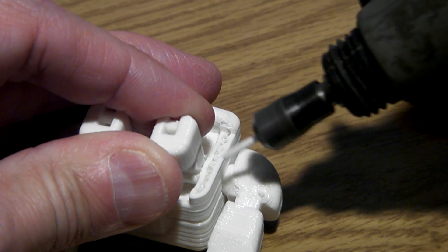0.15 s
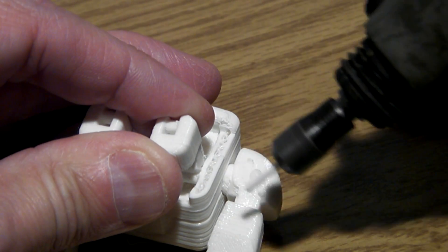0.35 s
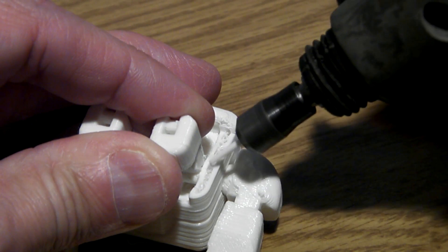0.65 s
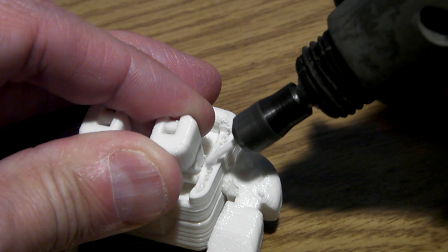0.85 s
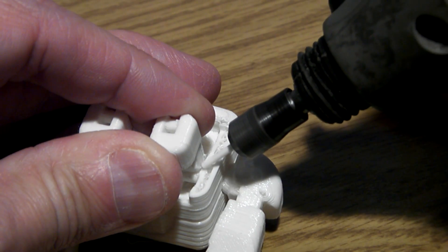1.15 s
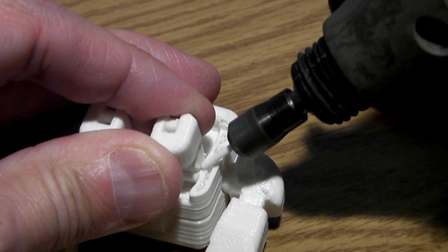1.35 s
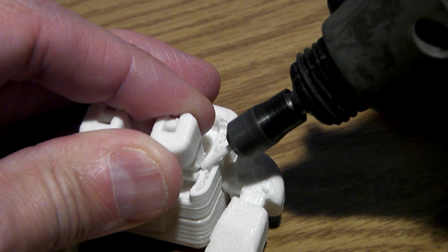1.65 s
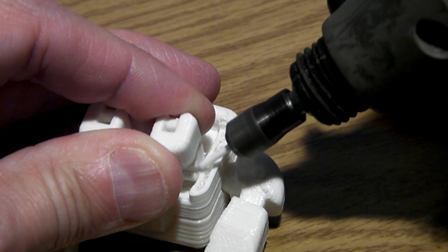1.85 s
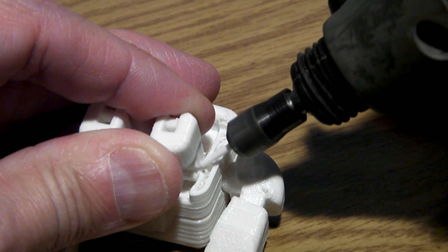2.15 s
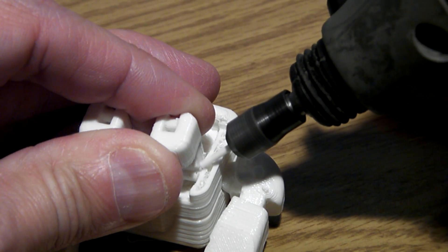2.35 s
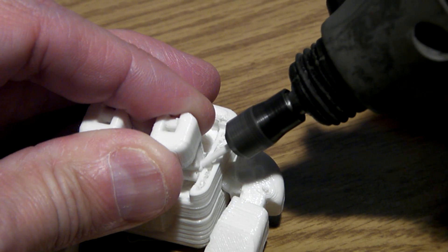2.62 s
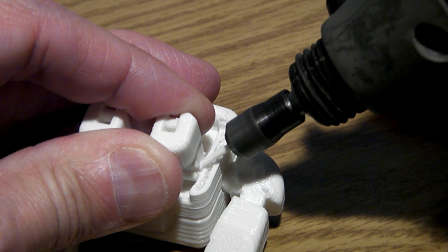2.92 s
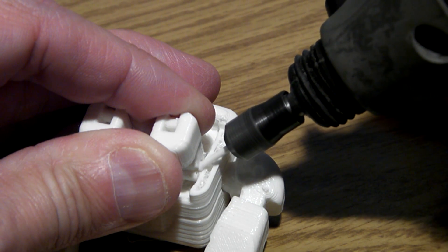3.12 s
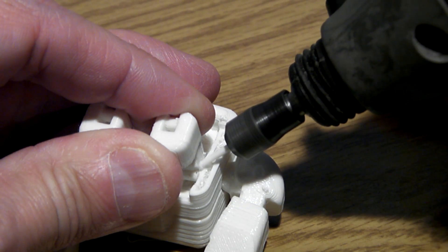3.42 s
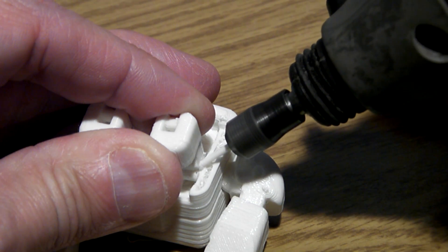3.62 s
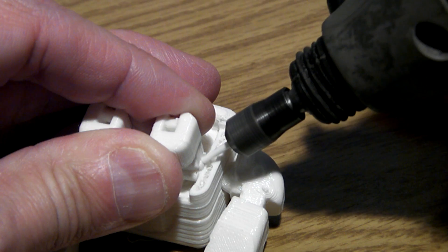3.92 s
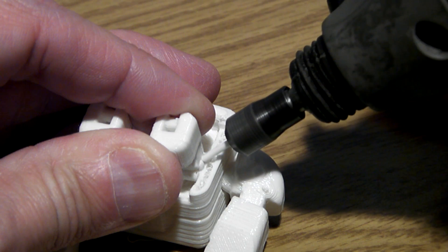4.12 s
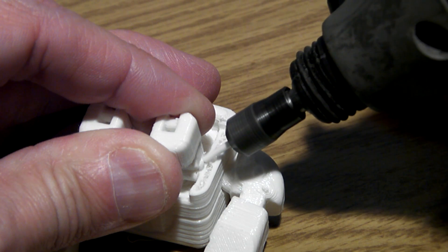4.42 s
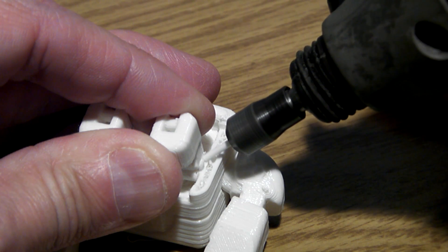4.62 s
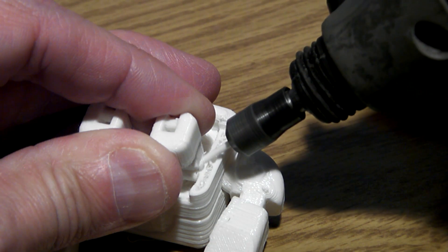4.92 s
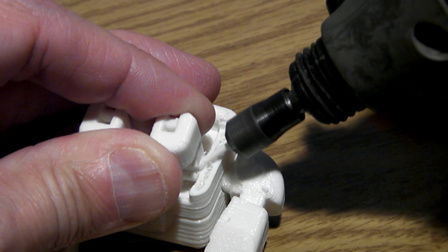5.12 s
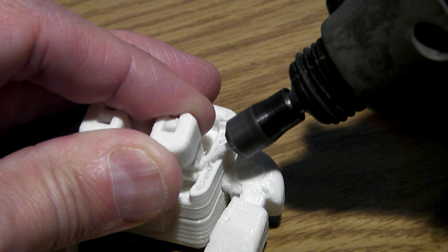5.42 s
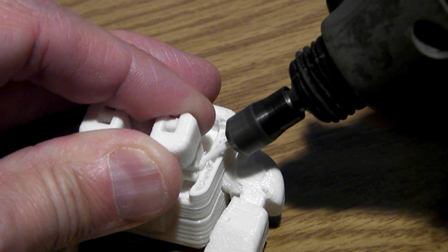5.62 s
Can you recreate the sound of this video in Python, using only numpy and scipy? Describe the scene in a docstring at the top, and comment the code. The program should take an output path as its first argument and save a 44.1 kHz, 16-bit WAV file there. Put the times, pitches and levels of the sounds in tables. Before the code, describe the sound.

Close, piercing electric motor whine with airy hiss and mains buzz; a few quick plastic rattles and scrapes after one second, then a continuous drone.

```python
"""A mains motor whines in a handheld rotary tool at about 18000 turns a minute, close to a mono microphone.
One shaft angle drives sines for the armature slots, fan blades, bearings and rotor harmonics.
The tool spins a plastic filament against a printed part: the touches ring as chatter and scrape, then the
filament melts into the seam and drags the speed down a little. Shaped noise makes the fan and brush hiss
and one hollow rush; a damped low sine makes a bump on the bench."""
import sys
import numpy as np
from scipy import signal
from scipy.fft import rfft, irfft
from scipy.io import wavfile

SR = 44100
rng = np.random.default_rng(int(sys.argv[2]) if len(sys.argv) > 2 else 0)


def unload_audio(sound):
    """Save the sound as a 16-bit wav file, at the path given as the first command line argument."""
    columns = np.transpose(np.atleast_2d(sound))
    # keep every value between -1 and 1, then stretch to whole-number steps
    steps = np.round(np.clip(columns, -1, 1) * 32767)
    wavfile.write(sys.argv[1], SR, steps.astype(np.int16))


N = 254456
T = np.arange(N) / SR
HZ = np.fft.rfftfreq(N, 1 / SR)

# shaft speed: t/s, rate/(turns/s)
SHAFT_SPEED = [(0, 308.0), (0.7, 307.8), (1.4, 307.0), (1.6, 306.1), (1.9, 304.1), (2.15, 303.5),
               (2.35, 301.7), (2.7, 299.3), (2.9, 298.3), (3.17, 298.3), (3.35, 297.5), (3.8, 296.8),
               (4.4, 295.9), (4.62, 296.8), (4.8, 296.0), (5.05, 296.0), (5.4, 295.3), (5.77, 295.0)]
# loud tones, before trim and flutter: free level/dB, loaded level/dB, change while drawn back/dB
SLOT_BUZZ = (-30, -29.5, -4)
BLADE_TONE = (-26.5, -23.5, -.5)
BLADE_OCTAVE = (-30, -31.5, -4)
LOW_WHISTLE = (-32, -33.5, 1)
HIGH_WHISTLE = (-31, -32.5, -2)
# hand draws the tool back: t of farthest point/s, half length/s
DRAW_BACK = (0.26, 0.2)
# further bearing tones, before trim: multiple of inner race rate, shaft sideband, free level/dB, loaded level/dB
BEARING_TONES = [(5, 1, -50, -56), (7, 1, -38, -43), (8, 1, -36, -34), (9, 1, -35.5, -31),
                 (12, -2, -33, -35)]
# rotor harmonics, before trim: multiple of shaft rate, free level/dB, loaded level/dB
SHAFT_HARMONICS = [(1, -46.5, -49), (2, -52.5, -57.5), (6, -41.5, -44.5), (7, -40, -44), (10, -43.5, -40.5),
                   (11, -40, -36), (12, -48.5, -38), (14, -36.5, -36), (15, -41, -41.5), (16, -41.5, -39.5),
                   (17, -41, -42), (19, -42, -61), (20, -49, -38), (21, -44, -49), (22, -37, -42.5),
                   (24, -32.5, -44), (31, -37, -40), (33, -32, -40), (34, -33.5, -34.5), (37, -52, -39),
                   (38, -45, -43), (41, -37, -39), (42, -42, -37), (43, -38, -42), (45, -43, -42),
                   (46, -36, -38), (47, -32, -37), (48, -38, -30), (49, -36, -30)]
# peaks and dead spots the tones slide through: f/Hz, width/Hz, lift/dB
TONE_SPOTS = [(2332, 16, -3), (2393, 20, 4), (2403, 8.4, -10), (2445, 23, 3), (2463, 11, -2.5),
              (4540, 96, 7.5), (4770, 41, -8), (5351, 11, -4.5), (5430, 26, 3), (5475, 87, -2),
              (8800, 29, 3.5), (8950, 43, -6), (8970, 70, 6), (10770, 36, 8), (10870, 130, 5),
              (12900, 180, 4), (14800, 630, -4.5)]
# housing resonances and hollows: f/Hz, width/Hz, lift/dB
HOUSING_MODES = [(418.4, 10.5, 8.5), (1256, 93, 8), (1610, 43, -6), (2036, 120, -5.5), (2190, 21, -8),
                 (2390, 17, 0), (2570, 23, -6), (2880, 140, -1.5), (3500, 130, -5), (3610, 110, -3),
                 (5130, 71, 1), (5740, 230, -4), (9280, 920, -3.5), (12020, 240, -16)]
# tip touches: t/s, length/s, chatter/dB and scrape/dB before trim, dip of tool level/dB (negative = rise)
TOUCHES = [(1.066, 0.028, -25.5, -23, 6.5), (1.103, 0.028, -27, -29, 0.5), (1.132, 0.045, -27, -22.5, 3.5),
           (1.188, 0.12, -30, -29, -0.5), (1.305, .024, -37, -23, 2), (1.328, .05, -26.5, -34, 0.5),
           (1.398, .024, -29, -22.5, 0.5), (5.42, 0.026, -42, -24, 2.3)]
# ring of the plastic part: f/Hz, nominal width/Hz, relative level/dB
PART_MODES = [(7050, 300, 0), (6700, 380, 0)]
# ring of the steel collet: f/Hz, nominal width/Hz, relative level/dB
COLLET_MODES = [(9900, 1000, 1), (13300, 2000, -5)]
# spectrum of air and brush noise: f/Hz, relative density/dB
AIR_SPECTRUM = [(25, -24.5), (130, -22.5), (480, -17), (620, -10), (800, -11), (1000, -4.5), (1450, -5.5),
                (1650, -8.5), (2700, -8), (4500, -6.5), (7000, -5.5), (10500, 0.5), (13500, -1.6),
                (15600, -8.5)]
# a brief hollow rush near 1.2 kHz: t/s, length/s, f/Hz, width/Hz, level/dB
HOLLOW_RUSH = (.198, .066, 1240, 220, -35.5)
# damped bench mode: f/Hz, t60/s, starting level/dB
BENCH_MODE = (210, .14, -44)
# dead bands of the microphone: f/Hz, width scale/Hz, depth/dB
MIC_NOTCHES = [(7870, 343, 31), (11770, 190, 16.5)]

SLOTS, BLADES, BALLS = 8, 18, 6
INNER_RACE_PER_TURN = 3.8355
PULSE_HZ = 120  # mains half waves
AIR_DB = -21
START_DB, SWELL_DB_PER_S = -7.5, 7.4
DIP_DELAY_S, DIP_FALL_S, DIP_RECOVERY_S = 0.004, 0.0063, 0.12
BUMP_S = 1.683
EDGE_HZ = 15700


def amp(db):
    """Decibels to gain."""
    return np.exp(np.asarray(db) * (np.log(10) / 20))


def unit(x):
    """Scales to rms 1."""
    return x / np.sqrt(np.mean(x ** 2) + 1e-20)


def drift(rate_hz):
    """Smooth noise of rms 1, Gaussian low-pass at the rate."""
    size = 2048
    f = np.fft.rfftfreq(size, N / SR / size)
    lowpass = np.exp(-(f / rate_hz) ** 2) * (f > 0)
    slow = irfft(rfft(rng.standard_normal(size)) * lowpass)
    return np.interp(T, np.linspace(0, T[-1], size), unit(slow))


def tone(turns, db):
    """Sine of the given rms level with a random starting phase."""
    phase = turns + rng.random()
    angle = 2 * np.pi * (phase - np.floor(phase))
    return np.sqrt(2) * amp(db) * np.sin(angle.astype(np.float32))


def mains(peak_s):
    """Angle within each mains half wave, zero at the current peak."""
    return 2 * np.pi * PULSE_HZ * (T - peak_s)


def tone_db(levels, load):
    """A loud tone's level follows the load and the drawing back of the hand."""
    free_db, loaded_db, back_db = levels
    far_s, half_length_s = DRAW_BACK
    drawn_back = np.exp(-((T - far_s) / half_length_s) ** 2)
    return free_db + load * (loaded_db - free_db) + back_db * drawn_back


def resonate(x, modes):
    """Filters with a sum of bell-shaped lifts and cuts in dB."""
    db = sum(lift_db / (1 + (2 * (HZ - hz) / width_hz) ** 2) for hz, width_hz, lift_db in modes)
    return irfft(rfft(x) * amp(db), N)


def armature(turns, load, level_db, sharpness=2.03, rest=0.091, bend_rad=0.98, free_lag_rad=0.69,
             loaded_lag_rad=0.017, trim_db=3.5, octave_db=-16, flutter_db=0.5):
    """Slots sing in a burst per current surge; the pitch dips in each burst, less so under load."""
    angle = mains(0.00556)
    burst = rest + np.exp(sharpness * (np.cos(angle) - 1))
    lag_rad = free_lag_rad + load * (loaded_lag_rad - free_lag_rad)
    swing_rad = bend_rad * np.cos(angle) - lag_rad * np.sin(angle)
    slots = SLOTS * turns + swing_rad / (2 * np.pi)
    db = level_db + flutter_db * drift(22.0)
    buzz = tone(slots, db + trim_db) + tone(2 * slots, db + octave_db)
    return resonate(unit(burst) * buzz, HOUSING_MODES)


def fan(turns, blade_db, octave_db, blade_trim_db=-0.1, octave_trim_db=-1.3, flutter_db=0.72):
    """The tone of the passing blades and its octave flutter in the air stream."""
    blade = tone(BLADES * turns, blade_db + blade_trim_db + flutter_db * drift(17.0))
    octave = tone(2 * BLADES * turns, octave_db + octave_trim_db + 2 * flutter_db * drift(24.0))
    return blade + octave


def bearings(turns, load, low_db, high_db, trim_db=-1.0, waver_db=2.0, slip_turns=0.0089,
             thicket_db=-45.0, scatter_db=3.0):
    """Balls roll over both races; the inner race turns with the shaft, which adds sidebands."""
    inner = INNER_RACE_PER_TURN * turns + slip_turns * drift(23.0)
    outer = BALLS * turns - inner
    out = tone(8 * inner - turns, low_db) + tone(11 * inner + turns, high_db)
    for multiple, side, free_db, loaded_db in BEARING_TONES:
        db = free_db + load * (loaded_db - free_db) + waver_db * drift(6.3)
        out += tone(multiple * inner + side * turns, db + trim_db)
    # thicket of faint tones, levelled along the air spectrum at their mean pitch
    faint = [k * outer for k in range(9, 24)]
    faint += [k * inner + side * turns for k in range(8, 14) for side in (-3, 0, 2, 3)]
    for phase in faint:
        mean_hz = phase[-1] / T[-1]
        out += tone(phase, thicket_db + air_db(mean_hz) + scatter_db * drift(1.0))
    return out


def shaft(turns, load, trim_db=-1.0, waver_db=1.94, flutter_db=1.22, hum_flutter_db=2.0,
          wobble_turns=0.043, throb=0.17):
    """Rotor harmonics fade in and out as the tool moves in the hand; the lowest hum flutters."""
    out = np.zeros(N)
    for multiple, free_db, loaded_db in SHAFT_HARMONICS:
        db = trim_db + free_db + load * (loaded_db - free_db)
        if multiple == 1:
            out += tone(turns, db + hum_flutter_db * drift(35.0))
            continue
        surge = 1 + throb * np.cos(mains(rng.random()))
        # bearing play blurs the high harmonics
        play = wobble_turns * multiple / BLADES * drift(30.0)
        db = db + waver_db * drift(1.9) + flutter_db * drift(18.0)
        out += surge * tone(multiple * turns + play, db)
    return out


def loudness_db():
    """Tool level swells steadily to full, then steps fast at each touch and recovers slowly."""
    db = np.minimum(START_DB + SWELL_DB_PER_S * T, 0)
    for touch_s, _, _, _, dip_db in TOUCHES:
        since_s = np.maximum(T - touch_s - DIP_DELAY_S, 0)
        fall = np.minimum(since_s / DIP_FALL_S, 1)
        recovery = np.exp(-np.maximum(since_s - DIP_FALL_S, 0) / DIP_RECOVERY_S)
        db = db - dip_db * fall * recovery
    return db


def contact(turns, touches, modes, rough):
    """One slap a turn, mixed with gritty rubbing, rings the modes while the tip touches."""
    from_slap = ((turns + 0.5) % 1 - 0.5) / np.gradient(turns)  # samples
    slaps = np.sinc(from_slap) * (abs(from_slap) < 10) * amp(1.6 * drift(120.0))
    grit = rng.standard_normal(N) * np.exp(-(turns % 1) / 0.38)  # fades within each turn
    drive = unit(slaps) + rough * unit(grit)
    body = sum(amp(db) / np.sqrt(1 + (2 * (HZ - hz) / width_hz) ** 2) ** 1.5
               for hz, width_hz, db in modes)
    press = sum(amp(db) * np.exp(-(2 * (T - s) / length_s - 1) ** 4) for s, length_s, db in touches)
    return press * unit(irfft(rfft(drive) * body, N))


def tip(turns, chatter_trim_db=1.0, scrape_trim_db=1.5):
    """Each touch makes the plastic part chatter and the steel collet scrape."""
    s, length_s, chatter_db, scrape_db, _ = np.transpose(TOUCHES)
    chatter = contact(turns, zip(s, length_s, chatter_db + chatter_trim_db), PART_MODES, rough=0.66)
    scrape = contact(turns, zip(s, length_s, scrape_db + scrape_trim_db), COLLET_MODES, rough=1.4)
    return chatter + scrape


def air_db(hz):
    """Air spectrum read on a log-frequency axis."""
    f, db = np.transpose(AIR_SPECTRUM)
    return np.interp(np.log(hz + 1), np.log(f), db)


def air(turns, patchy_db=0.83, hiss_drift_db=0.8, grain=0.11, throb=0.05):
    """Turbulence coloured by the housing; the brush hiss in it flickers with every turn and surge."""
    rush = irfft(rfft(rng.standard_normal(N)) * amp(air_db(HZ)), N)
    noise = unit(resonate(rush, HOUSING_MODES))
    hiss = irfft(rfft(noise) / (1 + (4000 / (HZ + 1)) ** 4), N)  # high-pass at 4 kHz
    flicker = 1 + grain * np.cos(2 * np.pi * turns) + throb * np.cos(mains(0.00079))
    low = (noise - hiss) * amp(patchy_db * drift(14.0))
    high = hiss * flicker * amp(hiss_drift_db * drift(17.3))
    return amp(AIR_DB) * (low + high)


def hollow_rush():
    """A band of noise swells briefly."""
    s, length_s, hz, width_hz, db = HOLLOW_RUSH
    spectrum = rfft(rng.standard_normal(N)) / (1 + (2 * (HZ - hz) / width_hz) ** 2)
    swell = np.exp(-(2 * (T - s) / length_s - 1) ** 4)
    return amp(db) * swell * unit(irfft(spectrum, N))


def bump():
    """The part shifts on the bench: one low, quickly damped mode."""
    hz, t60_s, db = BENCH_MODE
    t = np.maximum(T - BUMP_S, 0)
    return amp(db - 60 * t / t60_s) * np.sin(2 * np.pi * hz * t)


def scene():
    """One shaft angle drives tones, hiss and touches; two equal channels."""
    shaft_hz = np.interp(T, *np.transpose(SHAFT_SPEED))
    turns = np.cumsum(shaft_hz + 0.043 * drift(10.5)) / SR
    load = (shaft_hz.max() - shaft_hz) / np.ptp(shaft_hz)  # friction sags the speed: 0 free, 1 loaded
    buzz = armature(turns, load, tone_db(SLOT_BUZZ, load))
    whine = fan(turns, tone_db(BLADE_TONE, load), tone_db(BLADE_OCTAVE, load))
    whistle = bearings(turns, load, tone_db(LOW_WHISTLE, load), tone_db(HIGH_WHISTLE, load))
    tones = buzz + whine + whistle + shaft(turns, load)
    tool = resonate(tones, TONE_SPOTS) + air(turns)
    mix = amp(loudness_db()) * tool + tip(turns) + hollow_rush() + bump()
    return np.array([mix] * 2)


def record(dry):
    """The microphone's two notches, then the band limit."""
    cut_db = sum(depth_db / (1 + ((HZ - hz) / width_hz) ** 2) ** 1.64
                 for hz, width_hz, depth_db in MIC_NOTCHES)
    coloured = irfft(rfft(dry) * amp(-cut_db), N)
    lowpass = signal.firwin(767, EDGE_HZ, window=("kaiser", 9), fs=SR)
    return signal.oaconvolve(coloured, lowpass[None], "same")


dry = scene()
out = record(dry)
unload_audio(out)
```